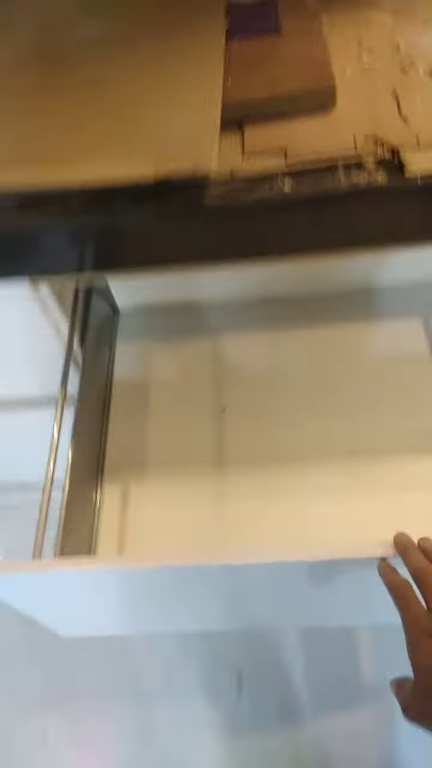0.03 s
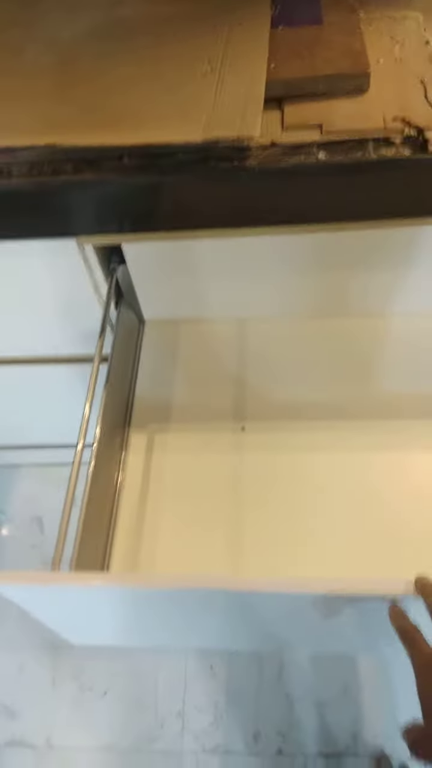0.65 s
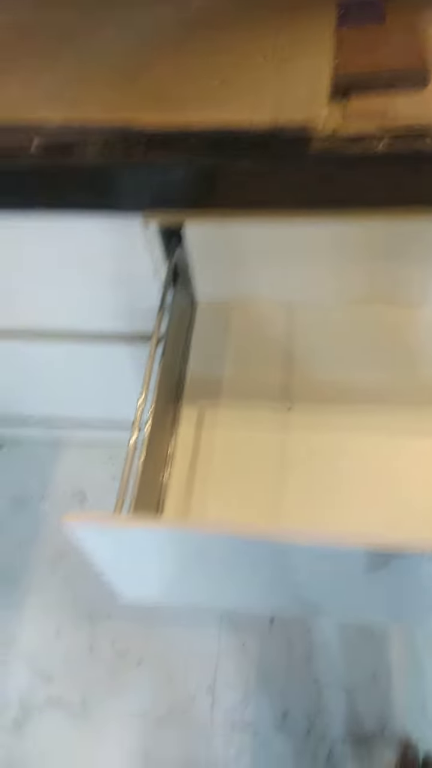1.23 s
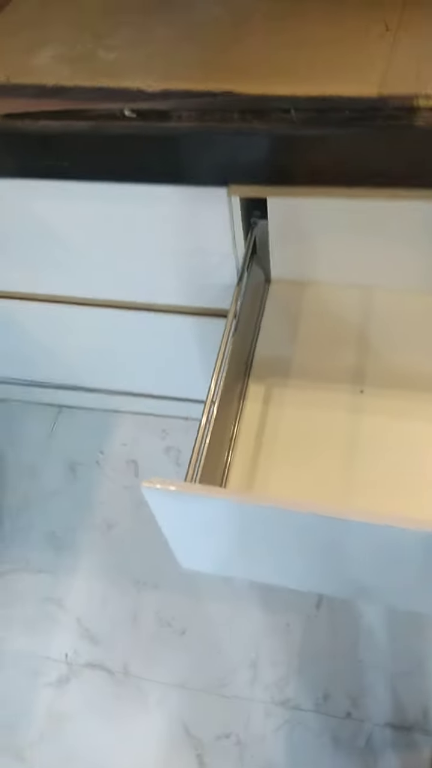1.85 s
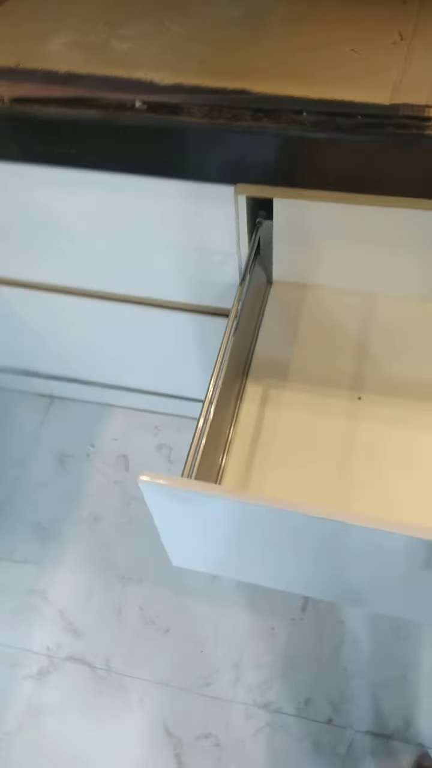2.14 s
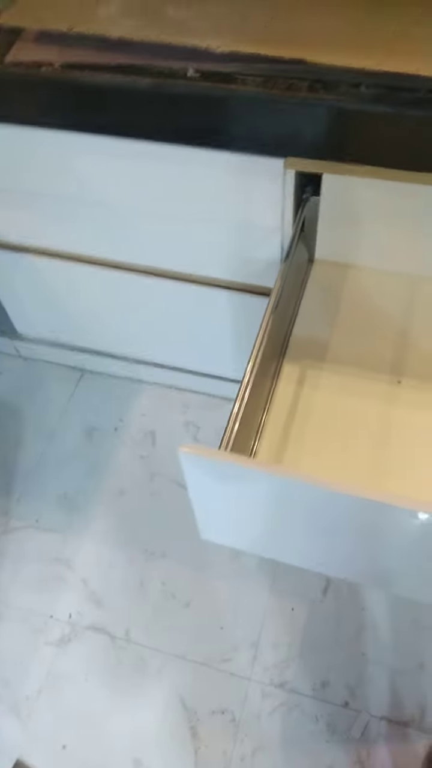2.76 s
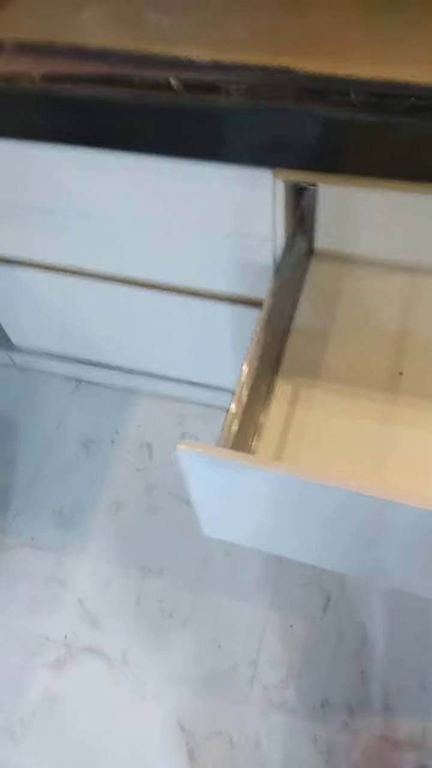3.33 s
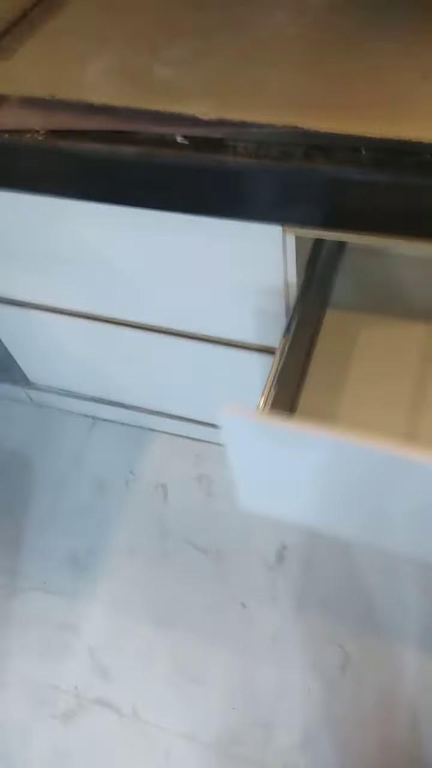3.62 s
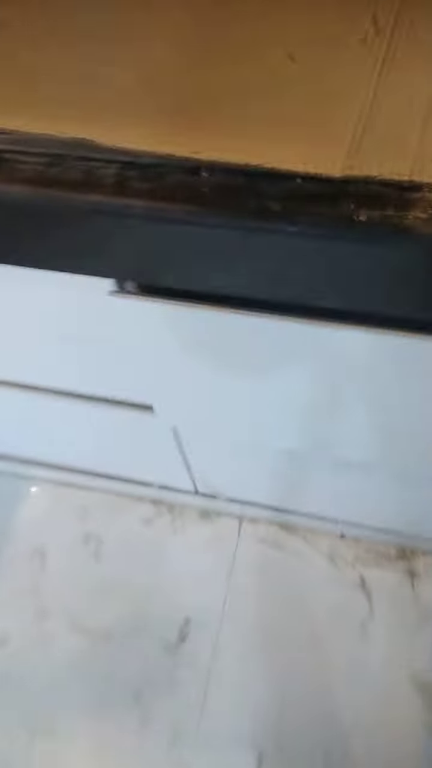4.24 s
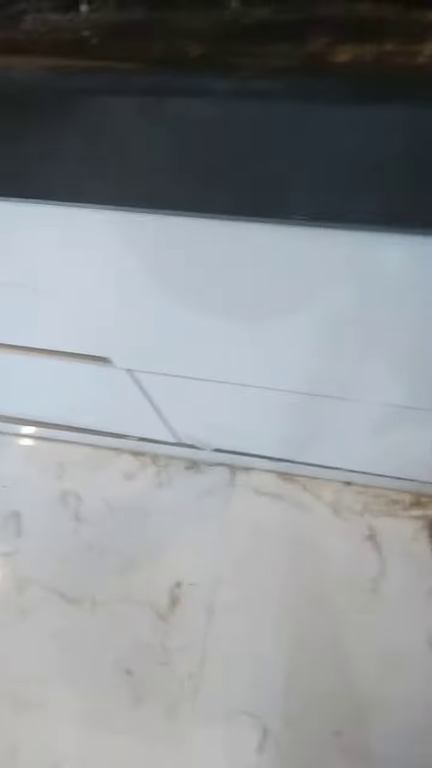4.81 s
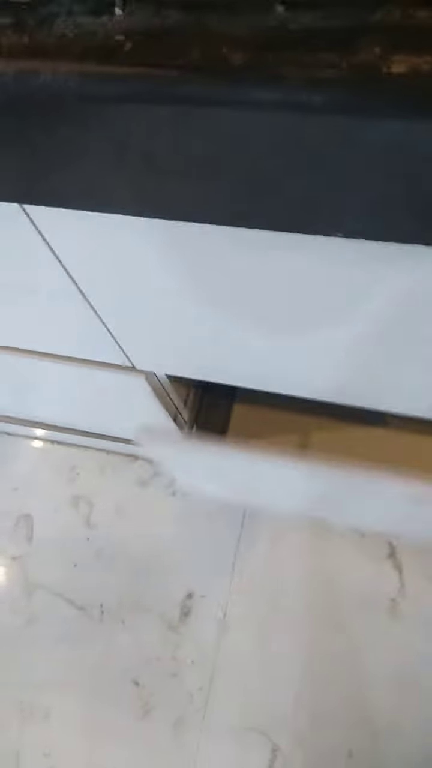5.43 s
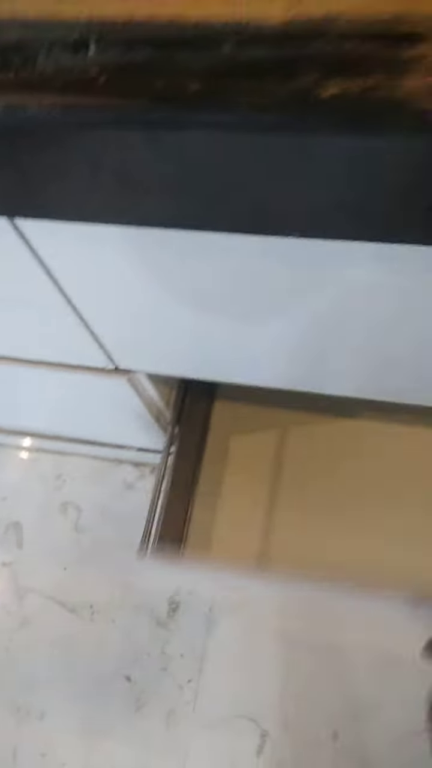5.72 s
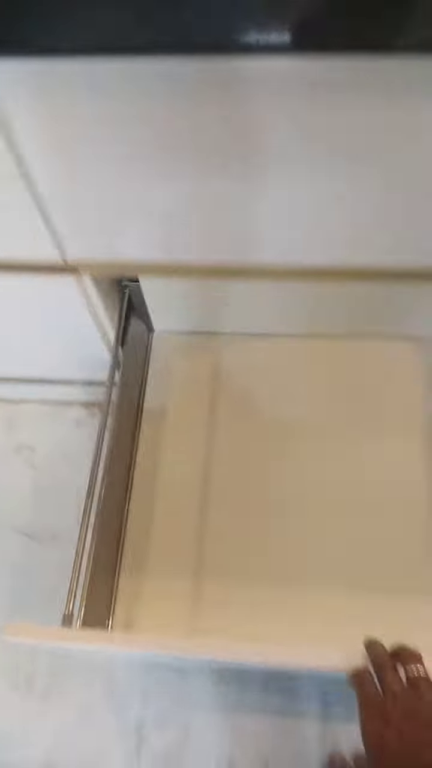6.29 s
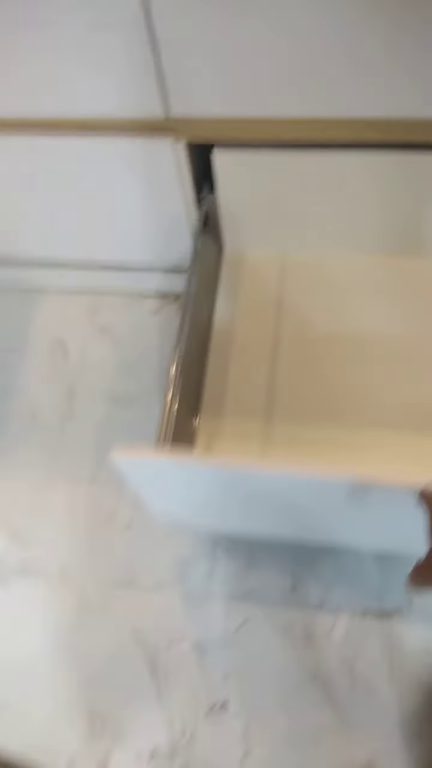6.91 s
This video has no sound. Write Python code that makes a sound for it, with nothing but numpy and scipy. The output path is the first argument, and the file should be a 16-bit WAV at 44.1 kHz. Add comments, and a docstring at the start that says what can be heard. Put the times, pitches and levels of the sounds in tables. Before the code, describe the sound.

A wide, empty kitchen drawer rolls out on steel runners and hits its end stop with a loud, hollow bang. It is jogged to and fro with several thumps, then rumbles shut with sharp metal clicks. A second drawer rolls open, knocking and snapping along its track. The hard, tiled room rings briefly, and clothing rustles faintly close to the hand-held microphone.

```python
"""A hard, tiled kitchen. A wide, empty drawer rolls out on steel runners, bangs on its end stop, is jogged to
and fro and slid shut; a second drawer is then pulled open. Rollers drum and knock on the tracks, the chipboard
boxes boom, steel catches snap and the room rings on. A hand rubs the drawer front in faint hisses that come and
go, and clothing rustles close to the hand-held microphone over a low murmur of air."""
import sys
import numpy as np
from scipy import signal
from scipy.fft import rfft, irfft, next_fast_len
from scipy.io import wavfile
from scipy.ndimage import uniform_filter1d

SR = 44100
rng = np.random.default_rng(int(sys.argv[2]) if len(sys.argv) > 2 else 0)


def put_to_file(sound):
    """Save the sound as 16-bit audio at rate SR, in the file named by the first command-line argument."""
    columns = np.atleast_2d(sound).T  # one column per channel
    safe = np.clip(columns, -1, 1)
    whole_steps = np.round(safe * 32767)
    wavfile.write(sys.argv[1], SR, whole_steps.astype(np.int16))


N = 311346

# drawer strokes: (time [s], relative speed)
FIRST_PULL = [(0, 0.55), (.07, 0.9), (.16, 0.42), (.27, 0.33), (.41, 0.27), (.53, 0.28)]
FIRST_PUSH = [(3.12, 0.0034), (3.2, 0.084), (3.28, 0.12), (3.38, 0.256), (3.53, 0.95), (3.72, 0.98),
              (3.86, 1.13), (4.12, 0.48), (4.25, .6), (4.53, 0.015)]
SECOND_PULL = [(4.93, 0.069), (5.08, 0.254), (5.17, 0.1265), (5.27, 0.34), (5.54, 0.75), (5.72, 1.21),
               (5.9, 0.94), (6.2, 0.48), (6.31, 0.6), (6.45, 0.359), (6.54, 0.17), (6.66, 0.09),
               (6.76, 0.274), (6.95, 0.11), (7.06, 0.14)]
# arm moves: (middle [s], length [s], level [dB], extra fizz [dB], left minus right [dB])
ARM_MOVES = [(0.0, 0.078, -42, -1.5, 0), (0.428, 0.21, -65, 4.5, 4.5), (1.425, 0.14, -60.5, 0.5, 1),
             (3.072, 0.11, -60.5, -0.5, 3), (3.363, 0.043, -68.5, -6.5, 0),
             (3.449, 0.059, -54.5, 4.5, -2.5), (3.596, 0.44, -56, 1, 0), (3.798, 0.35, -61, -12, -2),
             (4.122, 0.65, -53, 1, -7.5), (4.437, 0.44, -59.5, 7, 3), (5.053, 0.23, -63, -0.5, 4),
             (5.386, 0.23, -46, -1.5, -0.5), (5.61, 0.13, -53.5, 5, -5), (5.793, 0.24, -42, -1.5, -2.5),
             (6.046, 0.2, -52, -0.5, -2), (6.299, 0.055, -48.5, -11, -1), (6.428, 0.13, -48.5, -2, -1.5),
             (6.661, 0.14, -53, -3, -0.5), (6.855, 0.19, -51, -0.5, -1.5), (7.02, 0.28, -53, 15, -2.5)]
# runner knocks: (time [s], thud [dB], click [dB], dry snap [dB], box note [Hz], front note [Hz],
# panel note [Hz], note level [dB])
RUNNER_KNOCKS = [(0.002, -38, -43.5, 6, 249.5, 1010, 2216, 8), (0.215, -34.5, -67, 0, 243.7, 660, 1540, 18),
                 (0.441, -39, -66, 0, 198, 663, 1400, 18), (0.478, -34, -85, -6.5, 237, 660, 1470, 36),
                 (2.32, -35.5, -61.5, 5, 253, 950, 1700, 14), (3.3, -41, -80, -8, 177, 654, 1250, 8),
                 (3.585, -30.5, -60, 17, 229.2, 763, 1400, 32),
                 (3.961, -34, -47, 13, 308.5, 569, 1640, 15.5),
                 (3.986, -36.5, -67, 0, 172.8, 580, 1630, 23),
                 (4.192, -35.5, -45.5, 10, 378.6, 867, 1855, 19), (4.215, -37, -50, 6, 148, 854, 1860, 13),
                 (4.252, -34, -35, 8.5, 388.5, 900, 1720, 12.5),
                 (4.285, -40.5, -57, 15, 165.6, 843, 1550, 34), (4.476, -52.5, -61, 12, 245, 900, 2780, 13),
                 (4.662, -51.5, -51.5, 11, 130, 864, 1960, 11),
                 (4.923, -48.5, -56.5, 1, 219, 557, 1263, -7),
                 (4.958, -49.5, -55, -5.5, 347, 567, 1690, 30), (5.199, -52, -57, 1, 360, 574, 2040, 3),
                 (5.412, -40, -48, 2, 144, 892, 1770, 9), (5.579, -41, -75, 6, 518, 549, 1670, 19),
                 (5.641, -39.5, -44, -3, 466, 887, 1226, 8), (5.908, -41, -48, 10, 352, 1080, 2080, 32),
                 (6.38, -31, -49.5, 6, 292, 650, 1640, 14.5), (6.436, -36, -52, -1, 286, 948, 1755, 12),
                 (6.785, -43, -47.5, 4, 288.7, 1133, 2060, 6), (6.8, -38.5, -45.5, 9, 218.2, 1110, 1315, 9),
                 (7.028, -55, -45.5, -7, 264, 724, 1230, 9)]
# blows on the stops: (time [s], thud [dB], clack [dB], crack [dB], clink [dB], low-pass [Hz],
# box note [Hz], front note [Hz], panel note [Hz], note level [dB], box note T60 [s], mode lift [dB])
STOP_BLOWS = [(0.544, -16.5, -26, -29.5, -43.5, 14200, 173.1, 680, 1422, 4, 0.32, -3),
              (0.556, -22, -28, -28.5, -47.5, 14000, 310.4, 993, 2330, 2.5, 0.27, -2.5),
              (0.570, -21.5, -36, -53, -69, 12000, 183.3, 756, 2090, 3, 0.29, -10),
              (0.611, -48, -46, -41.5, -64, 8850, 469, 673, 1615, 9, 0.28, -7),
              (1.340, -34.5, -34, -39.5, -84, 7130, 433, 895, 1705, 19.5, 0.45, 2),
              (1.355, -30.5, -32.5, -41.5, -76, 7060, 281.3, 624, 1402, 15, 0.37, 6),
              (1.376, -26, -39, -53, -58, 7000, 257, 742, 1320, 11.5, 0.67, 2),
              (1.418, -35, -34.5, -49.5, -63, 6860, 144.7, 623, 1720, 12, 0.48, 0),
              (1.692, -20, -27.5, -31.5, -65, 10600, 409.6, 745, 1532, 6, 0.48, -1.5),
              (1.712, -24.5, -34, -44, -55, 9600, 235, 550, 1377, 5, 0.26, 0),
              (1.787, -29, -47, -50, -71.5, 6000, 311.5, 573, 1570, 10, 0.17, 5.5),
              (2.362, -36.5, -41.5, -51.5, -73.5, 4140, 320, 883, 1406, 5, 0.26, 4.5),
              (2.394, -35, -40.5, -55, -62.5, 4160, 284.7, 900, 1516, 7.5, 0.52, -2),
              (2.629, -30.5, -40.5, -45, -79, 4240, 302, 663, 1710, 8.5, 0.26, -2),
              (2.648, -28.5, -39.5, -43.5, -79, 4200, 238.4, 966, 1690, 10, 0.23, 2),
              (2.665, -37.5, -42, -52, -72, 4160, 355, 643, 1570, 10, .4, 4.5),
              (3.887, -27, -27, -30.5, -44, 14900, 347.5, 948, 1187, 8.5, 0.38, 2),
              (3.919, -30.5, -35.5, -39.5, -47, 15100, 390.6, 1020, 1360, 13, 0.34, 2)]
# swells of soft hiss: (middle [s], length [s], level [dB])
SOFT_HISSES = [(1.17, 0.37, -71.5), (1.604, 0.13, -70), (2.087, 0.11, -74), (3.254, 0.15, -75)]
# nudges of the open drawer: (start [s], end [s], relative top speed)
NUDGES = [(1.286, 1.381, 0.34), (2.273, 2.345, 0.22)]
# steel snaps: (time [s], click [dB], snap [dB], spring [dB], rail ring [dB], rattle decay [s])
CATCH_SNAPS = [(3.884, -35, -37, -45, -44, .009), (3.892, -52, -39.5, -56, -45, 0.034),
               (3.945, -50, -52, -50, -54, .018), (3.954, -45, -42, -54, -50, .006),
               (4.249, -34, -41.5, -43, -58, 0.032), (4.475, -45, -58, -48, -62, 0.0051),
               (4.662, -44, -62, -64, -72, 0.0044), (5.101, -50, -60, -66, -73, .005),
               (5.639, -35, -52, -70, -66, 0.011), (5.908, -34, -46.5, -62, -58, 0.013),
               (6.378, -33, -44, -47, -51, .005), (6.391, -42, -54, -62, -65, .005),
               (6.795, -45, -50, -53, -60, .008)]

# modes of boxes, fronts, panels and runners: (frequency [Hz], level [dB], T60 [s])
FIRST_BOX = [(140.8, -13, 0.4), (170.6, 1, 0.49), (236, -2.5, .52), (259, -2.5, 0.64), (300, -0.5, .45),
             (362, 0.5, 0.46), (406, 1.5, .42), (456.4, 1, 0.46), (520, -3.5, .38), (569, -6, 0.38)]
SECOND_BOX = [(146.1, 1, 0.58), (173.8, -5, 1), (216.6, -0.5, 0.98), (298.4, -6, 0.12), (341, -9, 0.63),
              (378, -7, 0.27), (450, -24, 0.71)]
FRONT = [(606, -3, .45), (664, -1, .42), (760, -3, .25), (820, -7, .35), (902, -1, .35), (969, -2, .28),
         (1021, -1, .36), (1130, -5, .28)]
PANELS = [(1254, -2, .3), (1350, -2, .25), (1425, -3, .42), (1615, -2, .3), (1735, -6, .4), (1836, -6, .32),
          (1900, -4, .28), (2075, -5, .32), (2265, -9, .36), (2450, -9, .3), (2665, -9, .22)]
RAILS = [(4210, 0, .1), (4474, -2, .12), (5100, -2, .08), (5814, -1, .08), (6352, 1, .09), (6700, -1, .07),
         (7070, 0, .11), (7500, -1, .07), (8100, -2, .06), (8850, -4, .08), (10540, -8, .06),
         (12600, -8, .07)]

# spectra of rolling, cloth, air and soft hiss: (frequency [Hz], level [dB])
FIRST_RUMBLE_EQ = [(30, -25.5), (70, -20.5), (105, -27.5), (145, -13.5), (195, -3.5), (235, 7), (310, 3.5),
                   (480, -1), (600, -1), (750, -3), (1000, -4), (2000, -39)]
SECOND_RUMBLE_EQ = [(30, -24), (70, -19), (105, -30), (145, -1), (195, -8), (235, 4), (310, 3.5),
                    (450, 2.5), (600, -1.5), (750, -9), (1000, -11), (2000, -41.5)]
GRIT_EQ = [(300, -36.5), (700, 6.5), (1100, 1.5), (1500, 3.5), (2300, -4.5), (3300, -12), (4500, -13),
           (7000, -26.5), (12000, -47)]
BEARING_EQ = [(1000, -23.5), (2200, 9), (3500, 6.5), (5000, -9.5), (7000, -10.5), (10000, -14.5),
              (15000, -13)]
CLOTH_EQ = [(500, -18.5), (1500, 5.5), (2500, 7), (4000, 2.5), (6000, -2), (8000, -8), (10500, -6),
            (13500, -2.5), (16000, -7.5)]
AIR_EQ = [(25, -15), (100, -10), (160, -2), (250, 1), (500, -12), (900, -23), (2200, -25), (5000, -40),
          (15000, -44)]
SOFT_HISS_EQ = [(600, -25.5), (1300, 5), (2200, -3), (3700, -5.5), (4600, -24), (9000, -27.5)]
# spectra of struck parts: (frequency [Hz], level [dB])
BOX_EQ = [(30, -37.5), (68, -9), (100, -22), (140, -3.5), (170, -6.5), (198, -4), (235, 7), (430, 4),
          (560, 1), (700, -14.5), (1000, -35.5), (2000, -84)]
FRONT_EQ = [(250, -42.5), (480, -17), (620, -10), (780, 2), (950, -0.5), (1150, -4.5), (1400, -19.5),
            (2500, -67.5)]
PANEL_EQ = [(600, -34), (1050, -5.5), (1400, 0.5), (1700, -3), (2100, -1), (2650, -9.5), (3200, -17),
            (4200, -23), (6000, -43.5), (9000, -70.5)]
RAIL_EQ = [(1500, -26.5), (3000, 14.5), (4200, 5.5), (5500, 4), (7200, -4.5), (9000, -3.5), (11000, -4),
           (13500, -10.5), (16000, -11.5)]
SNAP_EQ = [(1200, -36), (2500, -19), (4000, 1), (6000, 10), (8000, 2), (9500, -2), (12000, -30),
           (16000, -42)]
SPRING_EQ = [(4000, -53), (8000, -28), (11000, 18), (13500, 18.5), (16000, 1)]

# diffuse field: (frequency [Hz], left-right correlation)
CORRELATION = [(150, 0.99), (300, 0.96), (600, 0.77), (1000, 0.2), (2000, 0.67), (5000, 0.03),
               (15000, 0.058)]
# microphone ports: (frequency [Hz], left minus right [dB])
PORT_BALANCE = [(100, 0), (300, 1.15), (650, 0.5), (1200, 4.5), (2300, 10), (3500, 3), (5000, 1.5),
                (8000, -0.5), (14000, 12.5)]


def amp(db):
    """Decibels to gain."""
    return 10 ** (np.asarray(db) / 20)


def unit_rms(x):
    """Scales to rms 1."""
    return x / np.sqrt(np.mean(x ** 2) + 1e-20)


def curve_at(points, hz):
    """Interpolates on a log-frequency axis."""
    points_hz, values = np.transpose(points)
    return np.interp(np.log(hz + 1), np.log(points_hz + 1), values)


def add(mix, start_s, sound):
    """Mixes in a stereo sound."""
    part = mix[:, max(round(start_s * SR), 0):][:, :sound.shape[1]]
    part += sound[:, :part.shape[1]]


def convolve(x, taps):
    """Filters each channel, keeping the length."""
    return signal.fftconvolve(np.atleast_2d(x), np.atleast_2d(taps), axes=1)[:, :x.shape[-1]]


def colour(x, eq, size=4096):
    """Minimum-phase filter with spectrum eq."""
    log_gain = np.log(amp(curve_at(eq, abs(np.fft.fftfreq(size, 1 / SR)))))
    taps = np.fft.ifft(np.exp(np.conj(signal.hilbert(log_gain)))).real
    return convolve(x, taps[:size // 2])


def stereo_noise(count):
    """Diffuse field at two close microphones: alike in the bass, unrelated in the treble."""
    size = next_fast_len(count, True)
    left, other = rfft(rng.standard_normal((2, size)))
    shared = np.clip(curve_at(CORRELATION, np.fft.rfftfreq(size, 1 / SR)), 0, 1)
    right = shared * left + np.sqrt(1 - shared ** 2) * other
    return irfft(np.array([left, right]), size)[:, :count]


def grains(count, per_s, spread_db):
    """Sparse clicks, mostly small, a few large."""
    size = amp(spread_db * np.minimum(rng.exponential(1, count), 4))
    return size * rng.choice([-1, 1], count) * (rng.random(count) < per_s / SR)


def grainy_noise(count, eq, grain_gain, per_s, spread_db):
    """Coloured noise with clicks in it, rms 1."""
    rough = stereo_noise(count) + grain_gain * unit_rms(grains(count, per_s, spread_db))
    return unit_rms(colour(rough, eq))


def wander(count, samples):
    """Smoothed random drift, rms 1."""
    return unit_rms(uniform_filter1d(uniform_filter1d(rng.standard_normal(count), samples), samples))


def resonate(x, hz, width_hz):
    """Unity-gain resonance following the curve hz."""
    carrier = np.exp(2j * np.pi * np.cumsum(hz) / SR)
    pole = np.exp(-np.pi * width_hz / SR)
    return 2 * (carrier * signal.lfilter([1 - pole], [1, -pole], x / carrier)).real


def room(x, t60_s, wet_db):
    """Direct sound plus the diffuse tail off the tiles."""
    t = np.arange(SR // 2) / SR
    taps = stereo_noise(len(t)) * amp(-60 * t / t60_s)
    taps *= amp(wet_db) / np.linalg.norm(taps[0])
    taps[:, 0] += 1
    return convolve(x, taps / np.linalg.norm(taps[0]))


def with_note(modes, hz, db, t60_s):
    """Adds the mode favoured by the place of contact."""
    return list(modes) + [(hz, db, t60_s)]


def rolling(stroke, modes, eq, travel, boom_db, hum_db, slow_hz, rise_hz, width_hz,
            sing_db, grit_db, hiss_db):
    """Rollers drum on the track, louder with speed; the box booms more when out (travel: 0 in, 1 out)."""
    times_s, speeds = np.transpose(stroke)
    t = np.arange(times_s[0], times_s[-1], 1 / SR)
    count = len(t)
    speed = np.interp(t, times_s, abs(speeds))
    extension = travel[0] + (travel[1] - travel[0]) * np.cumsum(speed) / speed.sum()
    bumps = stereo_noise(count) + .5 * unit_rms(grains(count, per_s=130, spread_db=4.8))
    hum_hz = slow_hz + rise_hz * speed
    hum = resonate(resonate(stereo_noise(count), hum_hz, width_hz), hum_hz, width_hz)
    # a steady roller sings one wavering note within the hum
    cycles = np.cumsum(hum_hz * (1 + .025 * wander(count, samples=700))) / SR
    note = amp(sing_db + 3 * wander(count, samples=900)) * np.sin(2 * np.pi * cycles)
    hum = amp(hum_db) * unit_rms(unit_rms(hum) + note)
    boom = sum(amp(db) * resonate(bumps, np.full(count, hz), 3 / t60_s) for hz, db, t60_s in modes)
    boom = amp(boom_db) * unit_rms(colour(boom, eq))
    body = unit_rms(unit_rms(colour(bumps, eq)) + hum + boom)
    rumble = amp(-39 + 11.5 * extension) * speed ** 1.354 * body
    grit = amp(grit_db) * speed ** 1.18 * grainy_noise(count, GRIT_EQ, 0.43, per_s=490, spread_db=1.8)
    hiss = amp(hiss_db) * speed ** .9 * grainy_noise(count, BEARING_EQ, 1, per_s=160, spread_db=2.2)
    out = np.zeros((2, N))
    add(out, times_s[0], rumble + grit + hiss)
    return out


def sleeve():
    """Fibres slip over one another: a bright rustle that swells and fades with each arm move."""
    t = np.arange(N) / SR
    fizz_hz, edge_db = 9250, -6
    fibres = grainy_noise(N, CLOTH_EQ, grain_gain=0.39, per_s=2800, spread_db=2.7)
    fizz = signal.sosfiltfilt(signal.butter(2, fizz_hz, "high", fs=SR, output="sos"), fibres)
    swish_power, fizz_power = np.zeros((2, 2, N))
    for middle_s, length_s, db, fizz_db, pan_db in ARM_MOVES:
        swell = amp(db + edge_db * abs(2 * (t - middle_s) / length_s) ** 2.1)
        power = swell ** 2 * amp([[pan_db], [-pan_db]])
        swish_power += power
        fizz_power += power * amp(fizz_db) ** 2
    flutter_db = 1.1 * wander(N, samples=900)  # folds catch and slip
    return (np.sqrt(swish_power) * (fibres - fizz) + np.sqrt(fizz_power) * fizz) * amp(flutter_db)


def room_air():
    """Low murmur of air in the room."""
    return amp(-71) * unit_rms(colour(stereo_noise(N), AIR_EQ))


def ring(modes, t, scatter_db=2.0, max_split=.035, partner_gain=.4):
    """Decaying modes, each beating with a close partner; every blow shares its force differently."""
    out = np.zeros((2, len(t)))
    for hz, db, t60_s in modes:
        apart_rad = np.arccos(np.clip(curve_at(CORRELATION, hz), 0, 1)) * rng.choice([-1, 1])
        phase_rad = 2 * np.pi * rng.random() + np.array([[0], [apart_rad]])
        age_s = t[t < 2 * t60_s]
        gain = amp(db + scatter_db * rng.standard_normal())
        wave = gain * np.exp((2j * np.pi * hz - np.log(1000) / t60_s) * age_s)
        split_hz = hz * max_split * rng.uniform(.5, 1) * rng.choice([-1, 1])
        wave *= 1 + partner_gain * np.exp(2j * np.pi * split_hz * age_s)
        out[:, :len(age_s)] += (np.exp(1j * phase_rad) * wave).real
    return out


def struck(eq, modes, firmness, t60_s, modes_db, contact_db, chatter_s, swell_s):
    """One part hit: chattering contact, its own modes and a dense tail of cabinet and room."""
    t = np.arange(SR * 5 // 8) / SR
    attack = np.s_[:, :SR // 25]
    field = stereo_noise(len(t))
    contact = 0.38 * grains(len(t), per_s=700, spread_db=2) * field * np.exp(-t / chatter_s)
    contact[:, 0] = 1
    contact *= firmness * amp(contact_db) / contact[attack].std()
    swell = 1 - np.exp(-t * firmness / swell_s)  # soft bumps build slowly
    dense = colour(field * amp(-60 * t / t60_s) * swell + contact, eq)
    low_cut = signal.butter(4, 110, "high", fs=SR, output="sos")  # the ringing tones carry no deep bass
    tones = signal.sosfilt(low_cut, ring(modes, t) * swell)
    sound = dense / dense[attack].std() + amp(modes_db) * tones / tones[attack].std()
    return sound / sound[attack].std()


def blow(box, front, panel, thud_db, clack_db, crack_db, clink_db, snap_db, lift_db):
    """Box thuds, front clacks, panels crack, rails clink; snap_db dries the hit, lift_db raises modes."""
    firmness = np.clip(amp(0.12 * (crack_db - thud_db + 4.5)), .15, 1.5)  # brighter is harder
    chatter_scale = amp(-.6 * snap_db)
    damped_db = lift_db - .5 * snap_db
    thud = struck(BOX_EQ, box, firmness, t60_s=0.57, modes_db=lift_db + 7,
                  contact_db=-8.5, chatter_s=0.011, swell_s=0.0025)
    clack = struck(FRONT_EQ, front, firmness, t60_s=0.51, modes_db=damped_db + 7,
                   contact_db=snap_db - 9, chatter_s=0.021 * chatter_scale, swell_s=0.00075)
    crack = struck(PANEL_EQ, panel, firmness, t60_s=0.43, modes_db=damped_db + 2,
                   contact_db=snap_db - 17, chatter_s=0.022 * chatter_scale, swell_s=0.002)
    clink = struck(RAIL_EQ, RAILS, firmness, t60_s=0.42, modes_db=damped_db - 11,
                   contact_db=snap_db - 16.5, chatter_s=0.028 * chatter_scale, swell_s=0.003)
    return amp(thud_db) * thud + amp(clack_db) * clack + amp(crack_db) * crack + amp(clink_db) * clink


def runner_knocks(second_drawer_s=4.8):
    """Rollers cross joints, catches grip or let go; each knock shakes the moving drawer's box."""
    out = np.zeros((2, N))
    for time_s, thud_db, click_db, snap_db, box_hz, front_hz, panel_hz, note_db in RUNNER_KNOCKS:
        box = with_note(FIRST_BOX if time_s < second_drawer_s else SECOND_BOX, box_hz, note_db, 0.54)
        front = with_note(FRONT, front_hz, note_db + 0.5, t60_s=0.44)
        panel = with_note(PANELS, panel_hz, note_db - 3.5, t60_s=0.25)
        clink_db = click_db - 11.5 + 0.19 * (click_db - thud_db)  # less steel in soft knocks
        knock = blow(box, front, panel, thud_db, click_db - 3, click_db, clink_db, snap_db, lift_db=-1.5)
        add(out, time_s, knock)
    return out


def stop_bangs(snap_db=3.5):
    """The drawer hits a stop askew: near side, far side, rebound. Each blow has its own treble cut-off."""
    out = np.zeros((2, N))
    for (time_s, thud_db, clack_db, crack_db, clink_db, cutoff_hz,
         box_hz, front_hz, panel_hz, note_db, box_t60_s, lift_db) in STOP_BLOWS:
        box = with_note(FIRST_BOX, box_hz, note_db, box_t60_s)
        front = with_note(FRONT, front_hz, note_db - 2.5, t60_s=0.34)
        panel = with_note(PANELS, panel_hz, note_db - 2.5, t60_s=0.3)
        bang = blow(box, front, panel, thud_db, clack_db, crack_db, clink_db, snap_db, lift_db)
        low_pass = signal.butter(6, cutoff_hz, fs=SR, output="sos")
        add(out, time_s, signal.sosfilt(low_pass, bang))
    return out


def soft_hisses(edge_db=-6):
    """A hand rubs the drawer front: faint, dull, uneven swells of hiss."""
    t = np.arange(N) / SR
    level = sum(amp(db + edge_db * (2 * (t - middle_s) / length_s) ** 2)
                for middle_s, length_s, db in SOFT_HISSES)
    hiss = grainy_noise(N, SOFT_HISS_EQ, grain_gain=.4, per_s=600, spread_db=3)
    return level * hiss * amp(2.4 * wander(N, samples=1200))


def jogs():
    """The open drawer is nudged from rest and rolls up to a stop."""
    return sum(rolling([(start_s, 0), (end_s, speed)], FIRST_BOX, FIRST_RUMBLE_EQ, travel=(1, 1),
                       boom_db=23, hum_db=0, slow_hz=264, rise_hz=125, width_hz=130,
                       sing_db=-1.5, grit_db=-52.5, hiss_db=-77)
               for start_s, end_s, speed in NUDGES)


def catches(rise_s=0.00072):
    """The catch grips, ball cages meet their ends: steel rattles, a spring sizzles, the rails ring."""
    out = np.zeros((2, N))
    t = np.arange(SR // 4) / SR
    rise = 1 - np.exp(-t / rise_s)
    for time_s, click_db, snap_db, spring_db, rail_db, decay_s in CATCH_SNAPS:
        rattle = stereo_noise(len(t)) + unit_rms(grains(len(t), per_s=1800, spread_db=2))
        bands = [(click_db, PANEL_EQ), (snap_db, SNAP_EQ), (spring_db, SPRING_EQ)]
        burst = sum(amp(db) * unit_rms(colour(rattle, eq)) for db, eq in bands)
        rails = ring(RAILS, t)
        rails /= rails[:, :SR // 50].std()
        add(out, time_s, rise * (burst * np.exp(-t / decay_s) + amp(rail_db) * rails))
    return room(out, t60_s=0.25, wet_db=-6)


def scene():
    """Three strokes and two jogs, with impacts, soft hisses, clothing and air."""
    pull = rolling(FIRST_PULL, with_note(FIRST_BOX, hz=244, db=8, t60_s=0.9), FIRST_RUMBLE_EQ,
                   travel=(0.78, 1), boom_db=8.5, hum_db=6, slow_hz=328, rise_hz=64.76, width_hz=56,
                   sing_db=9.5, grit_db=-48, hiss_db=-60.5)
    shut = rolling(FIRST_PUSH, FIRST_BOX, FIRST_RUMBLE_EQ,
                   travel=(0.56, 0), boom_db=-4, hum_db=-5, slow_hz=238, rise_hz=105.6, width_hz=130,
                   sing_db=-1, grit_db=-45.5, hiss_db=-67.5)
    second = rolling(SECOND_PULL, SECOND_BOX, SECOND_RUMBLE_EQ,
                     travel=(0, 1), boom_db=-4, hum_db=-3, slow_hz=251.5, rise_hz=115, width_hz=100,
                     sing_db=5, grit_db=-48, hiss_db=-53.5)
    rollers = room(pull + shut + second + jogs(), t60_s=0.5, wet_db=-4.5)
    return rollers + stop_bangs() + runner_knocks() + catches() + soft_hisses() + sleeve() + room_air()


def record(dry):
    """Stereo microphone: the left port is brighter and a trace late; both are band-limited."""
    lag_s, cutoff_hz = 8e-5, 15650
    hz = np.fft.rfftfreq(N, 1 / SR)
    ports = amp(np.outer([.5, -.5], curve_at(PORT_BALANCE, hz)))
    ports /= np.sqrt(np.mean(ports ** 2, axis=0))
    delay = np.exp(-2j * np.pi * np.outer([lag_s, 0], hz))
    heard = irfft(rfft(dry) * ports * delay, N)
    low_pass = signal.firwin(1023, cutoff_hz, window=("kaiser", 9), fs=SR)
    return signal.oaconvolve(heard, low_pass[None], "same")


dry = scene()
out = record(dry)
put_to_file(out)
```